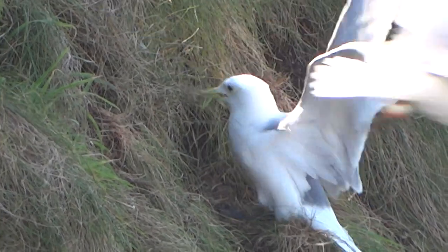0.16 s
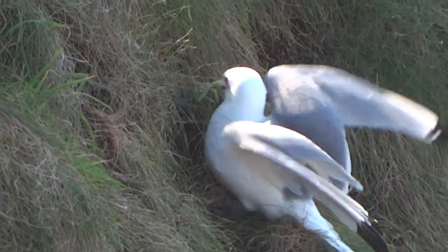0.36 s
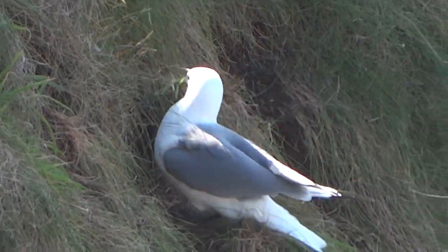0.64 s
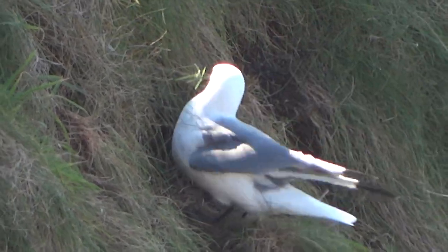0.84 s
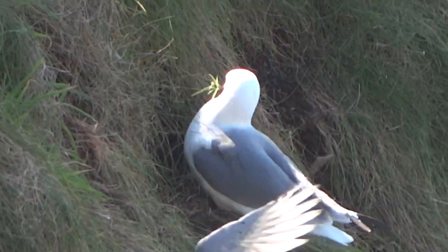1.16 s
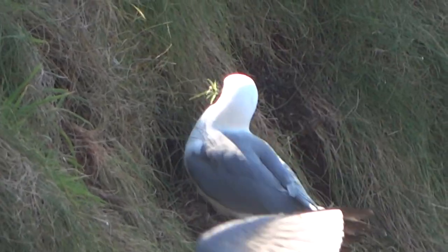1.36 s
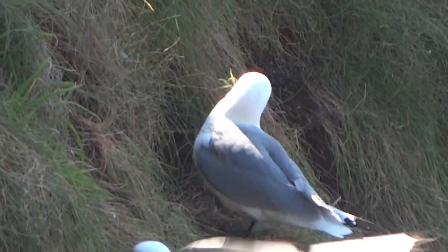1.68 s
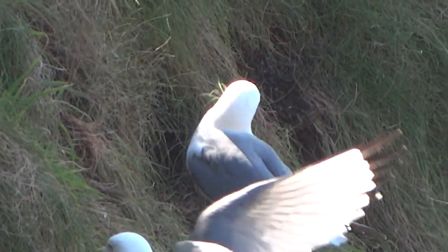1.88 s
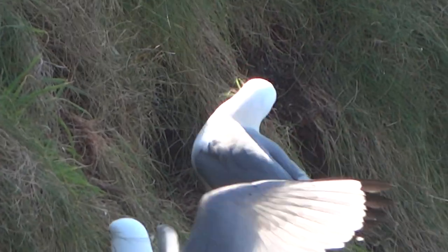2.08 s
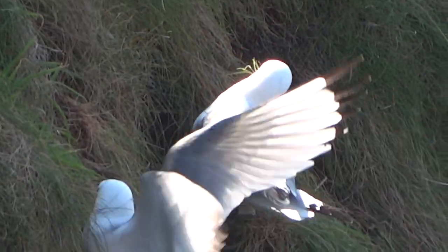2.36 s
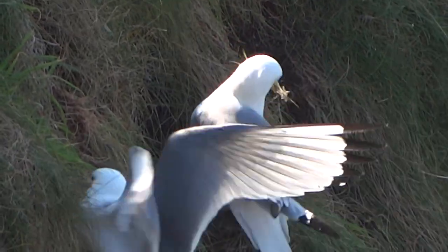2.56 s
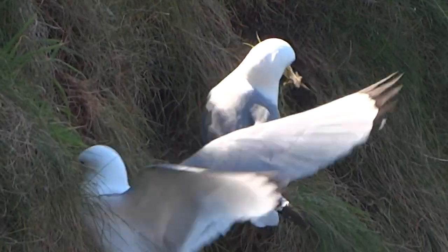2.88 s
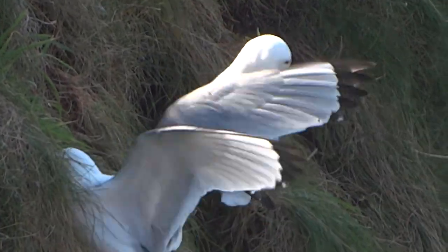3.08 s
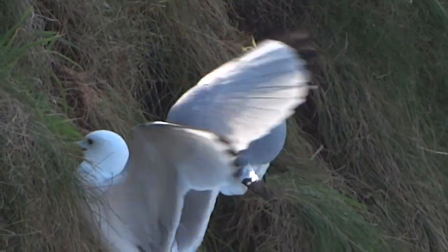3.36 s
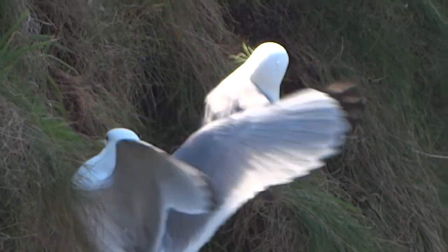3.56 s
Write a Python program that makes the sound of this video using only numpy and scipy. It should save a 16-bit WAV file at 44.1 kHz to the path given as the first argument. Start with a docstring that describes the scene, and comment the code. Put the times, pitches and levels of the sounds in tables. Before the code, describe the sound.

Kittiwake gulls wail and cry on a nesting cliff, over a distant colony and steady surf

```python
"""Kittiwakes call on a nesting cliff above steady surf.
Two near birds wail together, and the first voice cracks upward at its end; shorter cries are low or high.
Each voice is a stack of harmonics shaped by a throat; wings swish at the start as shaped noise.
The rest of the colony is a distant chorus of overlapping cries, and the rock echoes all the birds.
Surf and the blur of the farthest birds are bands of flickering noise."""
import sys
import numpy as np
from scipy import signal
from scipy.io import wavfile
from scipy.ndimage import map_coordinates

SR = 44100
rng = np.random.default_rng(int(sys.argv[2]) if len(sys.argv) > 2 else 0)


def persist_wave(psi):
    """Save psi, clipped to +-1, as 16-bit WAV."""
    counts = np.round(np.clip(psi, -1, 1) * 32767).astype(np.int16)
    wavfile.write(sys.argv[1], SR, np.atleast_2d(counts).T)


N = 164493  # samples in the scene
CUTOFF_HZ = 15700  # top of the noise bands and of the finished sound


def from_db(db):
    """Turn decibels into gain."""
    return 10 ** (np.asarray(db) / 20)


def rms_one(x):
    """Scale to unit power."""
    return x / np.sqrt(np.mean(x ** 2) + 1e-20)


def at_time(rows, t):
    """Read each column of a curve at the times t."""
    s, *columns = np.transpose(rows)
    return [np.interp(t, s, column) for column in columns]


def at_hz(points, hz):
    """Read a spectrum on a log-frequency axis."""
    table_hz, values = np.transpose(points)
    return np.interp(np.log(hz), np.log(table_hz), values)


def span(start, end):
    """Sample times between two moments, kept inside the scene."""
    return np.arange(max(int(start * SR), 0), min(int(end * SR), N)) / SR


def band(x, low_hz, high_hz):
    """Keep mainly the frequencies between two edges."""
    return signal.sosfilt(signal.butter(2, [low_hz, high_hz], "band", fs=SR, output="sos"), x)


def drift(rate_hz, t):
    """Random wander of spread 1: noise smoothed so that it changes little faster than about rate_hz."""
    step = 20  # the wander is computed at every 20th sample only
    r = np.exp(-2 * np.pi * rate_hz * step / SR)
    noise = rng.standard_normal(N // step + 2002)
    slow = signal.lfilter([1], [1, -2 * r, r * r], noise)[2000:]  # skip the filter's start-up
    return np.interp(t * SR / step, np.arange(len(slow)), rms_one(slow))


def voice(t, hz, db, rough, throat, wide=None, opening=0, beak_hz=None, count=18):
    """Harmonics of a jittering membrane, coloured by throat and beak; roughness shakes every partial."""
    jitter, jitter_hz = 0.016, 190  # pitch shake at full roughness (share of pitch), its speed
    flutter_db, flutter_hz, rasp_hz = 1.85, 21, 220
    beak_db, beak_width_hz = 6.5, 280  # height and half-width of the beak resonance
    shaky_hz = hz * (1 + jitter * rough * drift(jitter_hz, t))
    phase = 2 * np.pi * np.cumsum(shaky_hz) / SR
    tone, power, out = 0, 0, np.zeros(N)
    for k in range(1, count + 1):
        partial_hz = k * hz
        shape_db = (1 - opening) * at_hz(throat, partial_hz) + opening * at_hz(wide or throat, partial_hz)
        if beak_hz:
            shape_db = shape_db + beak_db / (1 + ((partial_hz - beak_hz) / beak_width_hz) ** 2)
        audible = partial_hz < SR / 2
        gain = from_db(shape_db + flutter_db * drift(flutter_hz, t)) * audible
        turn = k * phase + rng.uniform(0, 2 * np.pi)
        rasp = drift(rasp_hz, t) * np.cos(turn) + drift(rasp_hz, t) * np.sin(turn)
        tone = tone + gain * (np.sin(turn) + rough * rasp)
        power = power + gain ** 2 * (1 / 2 + rough ** 2)
    # dividing by the expected power leaves db as the level
    out[np.round(t * SR).astype(int)] = from_db(db) * tone / np.sqrt(power)
    return out


def wails():
    """Two near birds hold long notes; the first opens its beak wide and ends in a rasp."""
    # first wail, which cracks at its end: t/s, f/Hz
    wail_pitch = [(.42, 677), (.6, 664.7), (.72, 679), (.77, 657.6), (.87, 658), (.94, 646), (.955, 605),
                  (.99, 593)]
    # its effort: t/s, level/dB, beak opening/0-1, roughness/0-1
    wail_effort = [(.415, -64, 0.1, 0.5), (.434, -40, 0, 0.04), (.73, -40.5, 0.2, 0.18),
                   (.81, -35.5, 0.74, 0.2), (.935, -32, 1, 0.12), (.965, -34, 0.7, 0.8),
                   (.995, -41, 0.8, .8)]
    # its throat with the beak narrow and wide: f/Hz, relative level/dB
    beak_narrow = [(670, -27), (1340, -10), (2020, -18), (2700, -1.5), (3370, -12.5), (5400, -23.5),
                   (15000, -81)]
    beak_wide = [(660, -38), (1310, -10), (2620, -3.5), (3270, -7), (4570, -18.5), (5230, -18.5),
                 (5900, -38), (7200, -23), (11000, -50)]
    # the neighbour's wavering pitch: t/s, f/Hz
    answer_pitch = [(.525, 678), (.598, 611), (.645, 608), (.68, 591.5), (.73, 608.5), (.777, 617.5),
                    (.84, 569.5)]
    # the neighbour's loudness: t/s, level/dB
    answer_level = [(.525, -50), (.545, -38.5), (.58, -51), (.6, -33.5), (.78, -32), (.845, -37.5)]
    # the neighbour's throat: f/Hz, relative level/dB
    answer_throat = [(600, -31), (2430, -27), (3020, 1.5), (3650, -16.5), (4850, -20), (6700, -42.5),
                     (15000, -79)]

    t = span(wail_effort[0][0], wail_effort[-1][0])
    db, opening, rough = at_time(wail_effort, t)
    hz = at_time(wail_pitch, t)[0]
    first = voice(t, hz, db, rough, beak_narrow, beak_wide, np.clip(opening, 0, 1))

    t = span(answer_level[0][0], answer_level[-1][0])
    hz, db = at_time(answer_pitch, t)[0], at_time(answer_level, t)[0]
    return first + voice(t, hz, db, rough=0.14, throat=answer_throat)


def cry(start, length, first_hz, middle_hz, last_hz, db, rough, throat, beak_hz=None, count=18):
    """One short cry: the pitch curves through three points under an attack, a hold and a release."""
    attack_s, release_s = 0.013, 0.0096
    t = span(start, start + length)
    curve = np.polyfit([0, 1 / 2, 1], [first_hz, middle_hz, last_hz], 2)
    hz = np.polyval(curve, (t - start) / length)
    rise, fall = (t - start) / attack_s, (start + length - t) / release_s
    envelope = np.clip(np.minimum(rise, fall), 1e-4, 1)
    return voice(t, hz, db + 20 * np.log10(envelope), rough, throat, beak_hz=beak_hz, count=count)


def short_cries():
    """Short low cries and high squeals, one of them the first wail's voice cracking upward at its end."""
    # low cries: start/s, length/s, first f/Hz, middle f/Hz, last f/Hz, level/dB, beak resonance/Hz
    low_cries = [(.233, 0.025, 562, 592, 615, -32, 2950), (.257, 0.032, 663, 695, 770, -35.5, 2800),
                 (1.33, 0.2, 668.5, 655, 644, -47, 5250), (1.527, 0.063, 646, 643, 636, -39, 2580),
                 (1.599, 0.12, 624, 644.5, 616, -45, 7600), (2.256, 0.089, 644, 649, 556, -39.5, 1300),
                 (3.316, 0.0414, 661, 713, 785, -36.5, 2900), (3.446, .13, 600.5, 672, 661, -41.5, 2970),
                 (3.564, .15, 668, 658, 595, -42, 3900), (3.69, .12, 664, 689, 691, -34.5, 2700)]
    # high squeals; the one at 0.942 s is the first wail's own high voice taking over:
    # start/s, length/s, first f/Hz, middle f/Hz, last f/Hz, level/dB, beak resonance/Hz
    squeals = [(0.224, 0.053, 1994, 2070, 2060, -43.5, 2050), (.942, .043, 1836, 1812, 1775, -41, 1810),
               (1.187, 0.13, 1906, 1893, 1800, -46, 5700), (2.091, 0.068, 1885, 1830, 1800, -47, 3700),
               (2.149, 0.158, 1855, 1944, 1920, -47.5, 5970), (3.229, 0.096, 1860, 1848, 1810, -47.5, 5700)]
    # throat of the low cries: f/Hz, relative level/dB
    cry_throat = [(650, -15), (1320, -6.5), (2100, -15), (2700, 2), (3350, -3.5), (4000, -8), (4700, -18),
                  (7500, -27.5), (12500, -42)]
    # throat of the squeals: f/Hz, relative level/dB
    squeal_throat = [(1900, -9), (3800, 2), (5700, -13), (7600, -17), (9500, -29)]

    out = 0
    for *row, beak_hz in low_cries:
        rough = 0.25 * np.sqrt(0.028 / row[1])  # 0.25 for a cry of 0.028 s; longer ones are cleaner
        out = out + cry(*row, rough, cry_throat, beak_hz)
    for *row, beak_hz in squeals:
        out = out + cry(*row, 0.18, squeal_throat, beak_hz, count=6)
    return out


def wings():
    """Feathers of a landing bird swish briefly on each beat: band noise in short bell-shaped puffs."""
    # wingbeats: t/s, level/dB
    wingbeats = [(.09, -57), (.15, -52.5)]
    wing_s, wing_hz = 0.01, 3800  # width of a puff, middle of the band
    t = np.arange(N) / SR
    swish = rms_one(band(rng.standard_normal(N), wing_hz / 2, wing_hz * 2))
    return swish * sum(from_db(db) * np.exp(-((t - s) / wing_s) ** 2) for s, db in wingbeats)


def colony():
    """Far birds cry one over another at chance pitches; a few stand out."""
    # far cries, mostly their lowest partial: start/s, length/s, first f/Hz, last f/Hz, level/dB
    far_cries = [(1.605, 0.17, 2210, 1950, -46.5), (1.791, 0.073, 2034, 2080, -40),
                 (1.939, .12, 2080, 1880, -47.5)]
    # throat of those cries: f/Hz, relative level/dB
    far_throat = [(2000, 11), (8000, -46)]
    # throat of the chorus: f/Hz, relative level/dB
    chorus_throat = [(650, -33), (1320, 2), (1900, -10.5), (2900, 1), (5000, -12.5), (7300, -28),
                     (10000, -78)]
    far_arch = 0.0106  # how far the middle pitch lies above the average of the ends (share)
    chorus_count, chorus_db, chorus_hz = 46, -46.5, 640
    pitch_spread, pitch_arch = 0.08, 0.0349  # shares of the pitch

    far = 0
    for start, length, first, last, db in far_cries:
        middle = (first + last) / 2 * (1 + far_arch)
        far = far + cry(start, length, first, middle, last, db, rough=0.5, throat=far_throat, count=4)

    chorus = 0
    for k, (when, length, pitch, glide) in enumerate(rng.uniform(-1, 1, (chorus_count, 4))):
        hz = chorus_hz * (1 + pitch_spread * pitch)
        start = (k + when / 2 - 1) / chorus_count * N / SR  # even spacing, shifted by chance
        first, last = hz * (1 - pitch_arch * glide), hz * (1 - pitch_arch)
        chorus = chorus + cry(start, 0.28 + 0.0775 * length, first, hz, last, 0, rough=0.28,
                              throat=chorus_throat, count=13)
    return far + from_db(chorus_db) * rms_one(chorus)


def cliff(x):
    """Dull echoes circle between the rock faces and fade, partly shared by the two sides."""
    fade_s, dull_hz = 0.74, 8700  # time to fade by 60 dB, treble limit
    echoes = np.zeros((3, N))  # left, right, shared
    dull = signal.sosfilt(signal.butter(1, dull_hz, fs=SR, output="sos"), x + 1e-18)
    lags = (rng.uniform(0.017, 0.075, 12) * SR).astype(int)  # round trips of 17 to 75 ms
    for k, lag in enumerate(lags):
        loop, gain = dull.copy(), from_db(-60 * lag / SR / fade_s)
        for i in range(lag, N, lag):
            loop[i:i + lag] += gain * loop[i - lag:i][:N - i]
        echoes[k % 3] += (loop - dull) * (-1) ** k
    return (echoes[2] + 0.78 * echoes[:2]) / 2


def wash(spectrum, low_hz, patchy_db, count):
    """Bands of stereo noise, each with its own flicker, likeness and balance; rms 1."""
    # how alike left and right are: f/Hz, likeness/0-1
    likeness = [(500, .97), (900, 0.93), (1400, 0.34), (2000, 0.64), (2900, 1), (3800, 0.77), (4800, 0.15),
                (7000, 0.85)]
    # left minus right: f/Hz, difference/dB
    balance = [(150, 0.5), (650, -3), (2500, -0.5)]
    out, t, edges = 0, np.arange(N) / SR, np.geomspace(low_hz, CUTOFF_HZ, count + 1)
    sides = np.array([[1], [-1]])  # left, right
    white = rng.standard_normal((2, 2, N))  # neighbouring bands take turns with two noise pairs
    for k, (low, high) in enumerate(zip(edges, edges[1:])):
        mid, side = band(white[k % 2], low, high)
        hz = np.sqrt(low * high)
        alike = np.clip(at_hz(likeness, hz), 0, 1)
        flicker_db = patchy_db * drift(11.9, t)
        gain = from_db(at_hz(spectrum, hz) + flicker_db + sides * at_hz(balance, hz) / 2)
        out = out + gain * (np.sqrt(1 + alike) * mid + np.sqrt(1 - alike) * side * sides)
    return rms_one(out)


def farthest_birds():
    """The farthest birds blur into flickering noise with no separate cries."""
    # colour of the blur: f/Hz, relative level per Hz/dB
    blur_spectrum = [(1500, -27), (2650, 2), (3000, 3), (3750, -4), (4300, -10.5), (6200, -25), (7400, -21),
                     (8600, -40.5), (15000, -42)]
    # loudness of the blur: t/s, level/dB
    blur_level = [(0, -40), (2.7, -42), (3.73, -42.5)]
    level = from_db(at_time(blur_level, np.arange(N) / SR)[0])
    return level * wash(blur_spectrum, low_hz=1517, patchy_db=1.7, count=22)


def surf():
    """Steady surf is broad noise whose bands flicker gently."""
    # colour of the surf: f/Hz, relative level per Hz/dB
    surf_spectrum = [(25, -43), (90, -21.5), (190, -14.5), (310, -2), (580, -1.5), (900, 4), (1300, 1),
                     (1650, -0.5), (2500, -3), (5000, -26.5), (9000, -32.5), (16000, -39.5)]
    # loudness of the surf: t/s, level/dB
    surf_level = [(0, -39.5), (1.6, -41.8), (3.73, -41)]
    level = from_db(at_time(surf_level, np.arange(N) / SR)[0])
    return level * wash(surf_spectrum, low_hz=24.7, patchy_db=1.6, count=28)


def scene():
    """Near birds, far birds and surf; the left side lags, which pulls all a little to the right."""
    near, far = wails() + short_cries() + wings(), colony()
    echoes = cliff(from_db(-14) * near + from_db(-14.5) * far)
    left, right = near + far + echoes + surf() + farthest_birds()
    lag = 0.000022 * SR  # 22 microseconds, in samples
    late_left = map_coordinates(left, [np.arange(N) - lag], order=3, mode="nearest")
    return np.array([late_left, right])


def record(dry):
    """Stereo is slightly widened, the high treble narrows to the centre, and the top is cut steeply."""
    stereo_top_hz = 5870
    mid, side = (dry[0] + dry[1]) / 2, (dry[0] - dry[1]) / 2
    low_side = signal.sosfiltfilt(signal.butter(4, stereo_top_hz, fs=SR, output="sos"), side)
    side = 1.01 * low_side + 0.1 * side
    top_cut = signal.ellip(12, 0.1, 80, CUTOFF_HZ, fs=SR, output="sos")
    return signal.sosfilt(top_cut, [mid + side, mid - side])


dry = scene()
out = record(dry)
persist_wave(out)
```